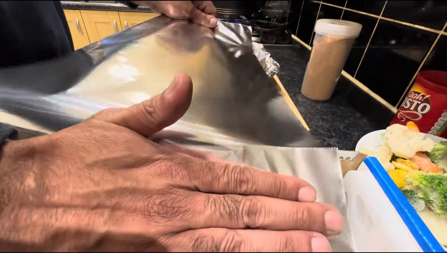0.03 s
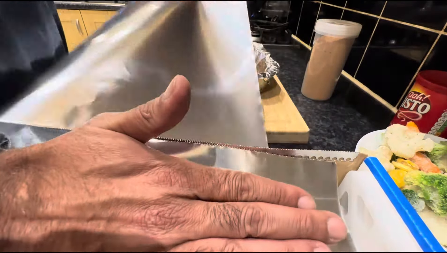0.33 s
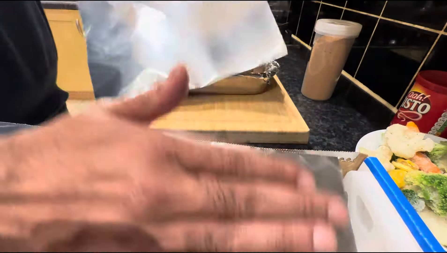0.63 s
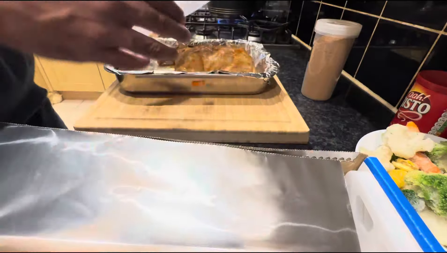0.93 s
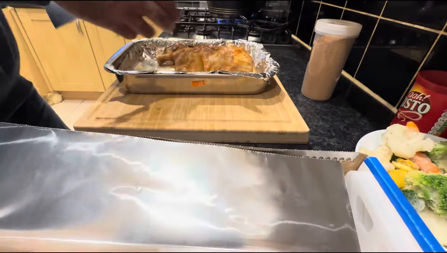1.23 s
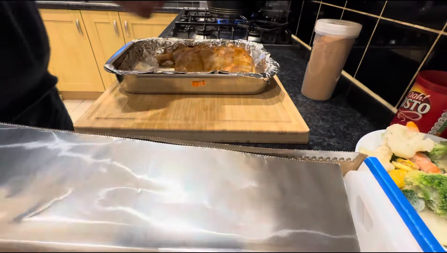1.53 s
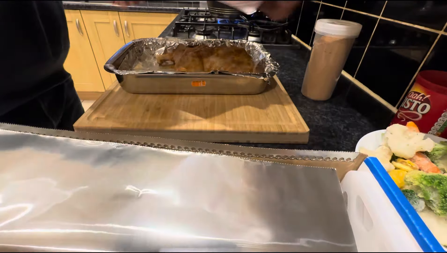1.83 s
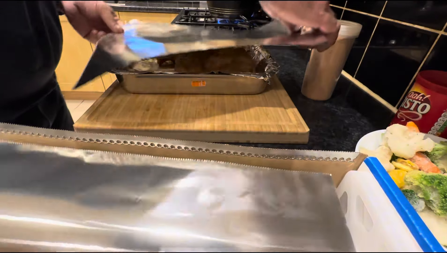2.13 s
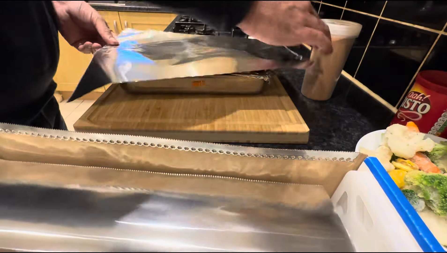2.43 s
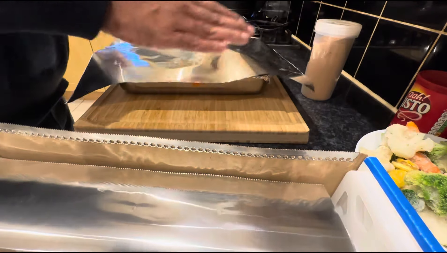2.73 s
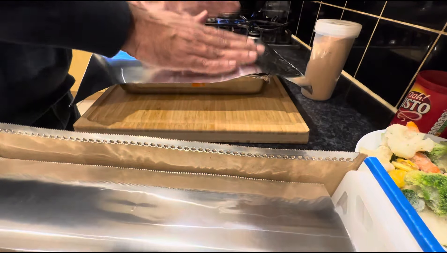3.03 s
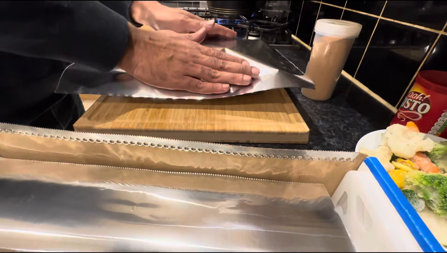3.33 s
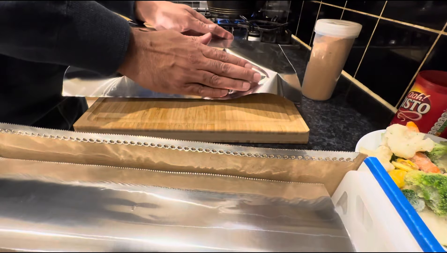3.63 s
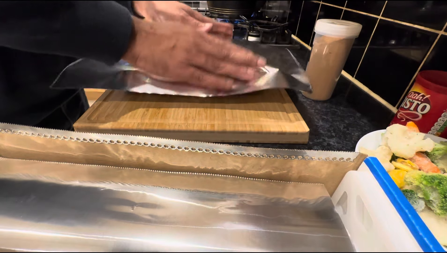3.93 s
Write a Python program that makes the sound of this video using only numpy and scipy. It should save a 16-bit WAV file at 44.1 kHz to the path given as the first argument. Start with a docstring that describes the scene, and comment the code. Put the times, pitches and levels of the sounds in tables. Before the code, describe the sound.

Aluminium foil ripped from its box, then crinkling as it is pressed over a tray.

```python
"""Tearing foil and covering a tray

Aluminium foil is ripped along the toothed edge of its box, lifted, spread and pressed over a roasting
tray. Every tooth plucks the sheet; afterwards tiny creases buckle in swarms as the hands move it,
with a few sharper snaps. A tiled kitchen answers, and appliances hum behind it all."""
import sys
import numpy as np
from scipy import signal
from scipy.fft import rfft, irfft, next_fast_len
from scipy.io import wavfile
from scipy.ndimage import uniform_filter1d

SR = 44100
rng = np.random.default_rng(int(sys.argv[2]) if len(sys.argv) > 2 else 0)


def log_audio(samples):
    """Write samples as a 16-bit WAV file to the path given in sys.argv[1]."""
    # one column per channel
    frames = np.atleast_2d(samples).T
    # limit to full scale, then quantise
    limited = np.clip(frames, -1, 1)
    pcm = np.round(limited * 32767).astype(np.int16)
    wavfile.write(sys.argv[1], SR, pcm)


N = 176400


def amp(db):
    """Decibels to gain."""
    return 10 ** (np.asarray(db) / 20)


def unit(x):
    """Scale to rms 1."""
    return x / np.sqrt(np.mean(x ** 2) + 1e-20)


def along(points, hz):
    """Interpolate (freq_hz, value) points on a log axis."""
    freqs, values = np.transpose(points)
    return np.interp(np.log(hz + 1), np.log(freqs + 1), values)


def curves(rows):
    """One value per sample for each column after time_s."""
    time_s, *columns = np.transpose(rows)
    return [np.interp(np.arange(N) / SR, time_s, column) for column in columns]


def during(rows, fade_s=0.011):
    """Gate: 1 from the first row's time to the last, fading outside."""
    t = np.arange(N) / SR
    return np.clip(np.minimum(t - rows[0][0], rows[-1][0] - t) / fade_s + 1, 0, 1)


def filtered(x, response):
    """Apply a frequency response, given as a function of Hz."""
    n = x.shape[-1]
    padded = next_fast_len(n + 8192)
    return irfft(rfft(x, padded) * response(np.fft.rfftfreq(padded, 1 / SR)), padded)[..., :n]


def coloured(x, spectrum, size=4096):
    """Minimum-phase filter from (freq_hz, gain_db) points; output rms 1."""
    cepstrum = irfft(np.log(amp(along(spectrum, np.fft.rfftfreq(size, 1 / SR)))))
    cepstrum[1:size // 2] *= 2
    cepstrum[size // 2 + 1:] = 0
    impulse = irfft(np.exp(rfft(cepstrum)))
    return unit(signal.fftconvolve(x, impulse[None], axes=1)[:, :x.shape[1]])


def evened(x, size=2600):
    """Level out slow swells, keep the grain."""
    power = uniform_filter1d(np.mean(x ** 2, axis=0), size)
    return x / np.sqrt(np.abs(power) + 1e-9)


def noise_band(hz, width_hz):
    """Narrow-band stereo noise, rms 1."""
    return unit(filtered(rng.standard_normal((2, N)), lambda f: np.exp(-((f - hz) / width_hz) ** 2)))


def creases(per_s, spread_db, life_s, top_hz, size=128):
    """A stereo swarm of buckling creases: short damped rings, each from its own place on the sheet."""
    when, pitch, strength, life, place, phase = rng.random((int(per_s * N / SR), 6)).T[:, :, None]
    k = np.arange(size)
    decay_samples = life_s * SR * 4 ** (life - .5)
    gain = amp(-spread_db * np.log(1 - .99 * strength)) / np.sqrt(decay_samples)
    rings = gain * np.exp(-k / decay_samples) * np.cos(2 * np.pi * (pitch * top_hz * k / SR + phase))
    at = (when * N).astype(int) + k
    lags = (40 * place).astype(int), 16  # left, right, in samples
    return np.array([np.bincount((at + lag).ravel(), rings.ravel(), N)[:N] for lag in lags])


# motor hum: time_s, pitch_hz, level_db
MOTOR_HUM = [(0.0, 53.6, -37.5), (0.73, 55.1, -32), (0.96, 53.85, -37.5), (1.28, 55.15, -35),
             (1.59, 54.6, -39), (2.61, 56.96, -42), (3.24, 57.7, -43), (3.49, 59.9, -42), (3.65, 57, -47.5),
             (3.78, 60, -70)]
# noise spectra: freq_hz, gain_db
RUMBLE_SPECTRUM = [(20, -28), (45, -24), (70, -10), (100, -11), (122, 0), (150, -12), (190, -26),
                   (400, -32), (2000, -78)]
AIR_SPECTRUM = [(60, -20.5), (230, 1.5), (400, -6.5), (750, -0.5), (1060, 2), (1400, -5.5), (3000, -19.5),
                (8000, -15.5), (16000, -30)]
# appliance whines: pitch_hz, level_db
WHINE_BANDS = [(1080, -60.5), (2970, -69), (5630, -69), (7660, -69)]


def appliances(mains_hz=101, mains_db=-52, rumble_db=-49, air_db=-51):
    """A motor that gathers speed and fades, mains hum, rumble, a faint rush of air and thin whines."""
    motor_hz, motor_db = curves(MOTOR_HUM)
    motor = amp(motor_db) * np.sin(2 * np.pi * np.cumsum(motor_hz) / SR)
    mains = amp(mains_db) * np.sin(2 * np.pi * mains_hz * np.arange(N) / SR)
    rumble = unit(filtered(rng.standard_normal(N), lambda f: amp(along(RUMBLE_SPECTRUM, f))))
    air = unit(filtered(rng.standard_normal((2, N)), lambda f: amp(along(AIR_SPECTRUM, f))))
    whines = sum(amp(db) * noise_band(hz, width_hz=83) for hz, db in WHINE_BANDS)
    return np.sqrt(2) * (motor + mains) + amp(rumble_db) * rumble + amp(air_db) * air + whines


# room decay: freq_hz, t60_s
KITCHEN_DECAY = [(150, 0.42), (600, 0.61), (2000, 0.67), (4000, 0.66), (8000, 0.47), (12000, 0.26)]


def kitchen(x, early_db=-1.5, early_s=0.011, tail_db=-5.5, rise_s=0.0048, block=8820):
    """Reflections off worktop and tiles, then the tail; drawn anew each block, as the sheet moves."""
    noise = rng.standard_normal((N // block + 1, 2, SR // 2))
    hz, t, bands = signal.stft(noise, SR, nperseg=256)
    decay = amp(-60 * t / along(KITCHEN_DECAY, hz)[:, None])
    tails = signal.istft(bands * decay, SR, nperseg=256)[1]
    t = np.arange(tails.shape[-1]) / SR
    tails = unit(tails * np.clip(t / rise_s, 0, 1))
    early = unit(rng.standard_normal(tails.shape) * np.exp(-t / early_s))
    responses = (amp(tail_db) * tails + amp(early_db) * early) / np.sqrt(len(t))
    out = np.zeros((2, N + SR))
    for i, response in zip(range(0, N, block), responses):
        part = signal.fftconvolve(x[:, i:i + block], response, axes=1)
        out[:, i:i + part.shape[1]] += part
    return out[:, :N]


# hand moves: time_s, crackle_db, rustle_db
LIFTING = [(.4, -37, -37), (.454, -29.5, -38.5), (.54, -31.5, -36.5), (.63, -25.5, -34), (.68, -35.5, -40),
           (.806, -33.5, -38), (.96, -59, -50), (1.07, -53, -46.5), (1.14, -56, -51.5)]
CARRYING = [(1.149, -45, -41), (1.165, -40.5, -43), (1.244, -32.5, -38.5), (1.325, -37, -44),
            (1.355, -26.5, -39), (1.52, -31, -40), (1.565, -29, -41), (1.621, -36.5, -45.5),
            (1.72, -35, -42), (1.81, -33.5, -44), (1.91, -39.5, -43.5), (2.0, -34.5, -43)]
SPREADING = [(2.012, -32.5, -43), (2.045, -27, -44), (2.138, -36.5, -42), (2.184, -22, -31.5),
             (2.217, -29.5, -41.5), (2.384, -32.5, -39.5), (2.518, -30.5, -39.5), (2.562, -43, -49),
             (2.62, -63, -45)]
PRESSING = [(3.005, -47, -52), (3.03, -32.5, -38.5), (3.07, -28, -42.5), (3.092, -22.5, -33),
            (3.172, -30, -39.5), (3.45, -33, -41), (3.5, -45.5, -42.5), (3.535, -32.5, -45),
            (3.6, -73, -53), (3.67, -68, -60)]
TUCKING = [(3.735, -61, -41.5), (3.75, -41.5, -48), (3.797, -44, -45), (3.825, -23.5, -31.5),
           (3.866, -37, -49.5), (3.94, -32, -42), (4.0, -39.5, -44.5)]
# crease spectra: freq_hz, gain_db
CRACKLE_SPECTRUM = [(300, -54), (1500, -17.5), (3000, -4), (4500, -1), (6000, 1.5), (8000, -0.5),
                    (11000, -4), (16000, -9.5)]
RUSTLE_SPECTRUM = [(80, -42.5), (250, -7.5), (450, -9.5), (700, -10), (1050, -1), (2000, 0.5), (2800, 1),
                   (4500, -6.5), (16000, -40)]
TRAY_SPECTRUM = [(100, -16), (300, -19), (550, -3), (800, -7.5), (1300, -5), (3000, -31), (16000, -76)]


def handling(hollow_db=-4.5):
    """Small creases crackle and wide ones rustle as the sheet moves; on the tray it also sounds hollow."""
    small = creases(per_s=3000, spread_db=3.5, life_s=0.0002, top_hz=17000, size=40)
    wide = creases(per_s=900, spread_db=1, life_s=0.00059, top_hz=4960)
    over_tray = creases(per_s=250, spread_db=3, life_s=0.00072, top_hz=2087)
    crackle = evened(coloured(small, CRACKLE_SPECTRUM))
    rustle = evened(coloured(wide, RUSTLE_SPECTRUM))
    hollow = evened(coloured(over_tray, TRAY_SPECTRUM)) * amp(hollow_db)
    in_air = np.vstack([LIFTING, CARRYING, SPREADING])
    on_tray = np.vstack([PRESSING, TUCKING])
    out = np.zeros((2, N))
    for moves, body in ((in_air, rustle), (on_tray, rustle + hollow)):
        crackle_db, rustle_db = curves(moves)
        out += during(moves) * (amp(crackle_db + 1) * crackle + amp(rustle_db + 2) * body)
    return out


# creases snapping through: start_s, level_db, pitch_hz, decay_s
CREASE_SNAPS = [(0.558, -15, 5140, 0.025), (0.79, -27, 8200, 0.011), (.991, -35.5, 6750, 0.0037),
                (1.224, -25.5, 7100, .014), (1.341, -26, 7000, 0.053), (1.556, -26.5, 5520, 0.015),
                (2.197, -23, 6540, 0.038), (3.08, -16.5, 5000, 0.02), (3.191, -25, 12100, .0074),
                (3.352, -23.5, 12500, .012), (3.415, -18.5, 14200, .004), (3.441, -27, 7020, .012),
                (3.481, -30, 11500, 0.0049), (3.588, -34, 8500, .005), (3.63, -21.5, 5600, 0.0069),
                (3.729, -28.5, 6200, .0076), (3.807, -22, 5270, 0.026)]
# snap spectrum: freq_hz, gain_db
SNAP_SPECTRUM = [(100, -26), (500, -8.5), (1500, -5), (6000, -10.5), (10000, -6), (16000, -4.5)]


def snaps(ring_q=2.8, ring_gain=4.3):
    """A crease gives way with a crack and sets off a quickly dying run of smaller ones."""
    out = np.zeros((2, N + SR))
    swarm = evened(creases(per_s=2800, spread_db=2, life_s=0.0001, top_hz=18000, size=32), size=400)
    t = np.arange(SR // 8) / SR
    for start_s, db, hz, decay_s in CREASE_SNAPS:
        i = round(start_s * SR)
        run = swarm[:, i:i + len(t)] * np.exp(-t / decay_s)
        run[:, 0] += 7  # opening crack
        rung = filtered(run, lambda f: 1 + ring_gain / (1 + 1j * ring_q * (f / hz - hz / (f + 1))))
        gain = amp(db) * np.sqrt(decay_s / t[-1] / 2)
        out[:, i:i + len(t)] += gain * coloured(rung, SNAP_SPECTRUM)
    return out[:, :N]


# flexing panels: start_s, level_db, pitch_hz, swell_s, glide_hz_per_s
PANEL_RINGS = [(.012, -23, 1402, .018, 1500), (.035, -27, 2035, 0.032, -600),
               (.105, -25, 1920, 0.021, -2800), (.118, -26, 1950, .02, 4500),
               (.138, -27, 2860, 0.0083, 4000), (1.905, -49, 301, 0.018, 0),
               (1.934, -36, 2100, 0.0067, -3000), (2.045, -40, 700, 0.0055, 0),
               (3.35, -34, 805, 0.0075, -7), (3.468, -46, 543, 0.015, 2)]


def panels(waver_rad=1.2):
    """A flexing panel of the sheet swells into a short, rough tone that glides as its tension changes."""
    out = np.zeros((2, N))
    for start_s, db, hz, swell_s, glide in PANEL_RINGS:
        t = np.maximum(np.arange(N) / SR - start_s, 0)
        phase = 2 * np.pi * (hz + glide * t / 2) * t + waver_rad * noise_band(0, width_hz=185)
        envelope = (t / swell_s * np.exp(1 - t / swell_s)) ** 2
        out += amp(db) * envelope * np.sin(phase)
    return np.sqrt(2) * out


# tear envelope: time_s, split_db, flutter_db
TEAR_LEVELS = [(0.0, -14.5, -16), (0.028, -18.5, -25.5), (0.108, -18, -29), (0.12, -18.5, -25),
               (0.224, -21, -26), (0.26, -23, -27), (0.4, -39.5, -44)]
# tear spectra: freq_hz, gain_db
SPLIT_SPECTRUM = [(300, -46), (1500, -40), (3000, -3.5), (4500, -3.5), (6500, -1), (8000, -1.5),
                  (11000, -3.5), (16000, -3.5)]
FLUTTER_SPECTRUM = [(100, -43), (300, -19), (600, -11), (1000, 0.5), (2000, -0.5), (2800, -3),
                    (4500, -11.5), (16000, -37)]


def tear():
    """The metal splits in a dense crackle while the sheet flutters."""
    split_db, flutter_db = curves(TEAR_LEVELS)
    small = creases(per_s=4500, spread_db=2.5, life_s=0.00008, top_hz=16600, size=32)
    wide = creases(per_s=1700, spread_db=4, life_s=0.00055, top_hz=5040)
    split = evened(coloured(small, SPLIT_SPECTRUM)) * amp(split_db + 3)
    flutter = evened(coloured(wide, FLUTTER_SPECTRUM)) * amp(flutter_db + 0.5)
    return (split + flutter) * during(TEAR_LEVELS)


# cutting speed: time_s, teeth_per_s
TOOTH_RATE = [(0, 800), (.01, 690), (.024, 670), (.033, 720), (.041, 610), (.052, 550), (.066, 520),
              (.071, 315), (.098, 325), (.11, 400), (.17, 380), (.18, 200), (.23, 215), (.32, 230)]
# drone of the taut sheet: time_s, tone_db, rasp_db
DRONE_LEVELS = [(0, -29, -22.5), (.018, -15.5, -24), (.032, -33, -27), (.05, -18.5, -22.5),
                (.066, -34, -22), (.088, -32, -23.5), (.105, -48, -24), (.132, -26, -27), (.15, -36, -37),
                (.175, -34, -33), (.195, -36, -29.5), (.225, -30.5, -26.5), (.265, -38, -30.5),
                (.32, -52, -43)]
# rasp spectrum: freq_hz, gain_db
RASP_SPECTRUM = [(60, -57.5), (190, -2), (280, -1.5), (420, 0), (700, -3.5), (1000, -5.5), (1400, -14.5),
                 (2000, -10), (4000, -31), (16000, -40)]


def teeth(scatter_periods=0.047, scatter_growth_per_s=0.3, spread_db=2, waver_rad=0.63, lead_s=0.00049):
    """The teeth pluck the taut sheet ever more slowly and unevenly: a falling tone and its rasp."""
    rate_hz, = curves(TOOTH_RATE)
    tone_db, rasp_db = curves(DRONE_LEVELS)
    teeth_cut = np.cumsum(rate_hz) / SR
    at = np.flatnonzero(np.diff(np.floor(teeth_cut)))
    late, strength = rng.standard_normal((len(at), 2)).T
    scatter = scatter_periods + scatter_growth_per_s * at / SR
    at = np.clip(at + scatter * late * SR / rate_hz[at], 0, N - 1).astype(int)
    plucks = np.bincount(at, amp(spread_db * strength), N)[None]
    rasp = evened(coloured(plucks, RASP_SPECTRUM), size=900)[0] * amp(rasp_db)
    lead = np.array([[.5], [-.5]]) * lead_s * rate_hz  # left hears the tone first
    phase = 2 * np.pi * (teeth_cut + lead) + waver_rad * noise_band(0, width_hz=185)
    tone = np.sqrt(2) * np.cos(phase) * amp(tone_db)
    gate = during(TOOTH_RATE)
    return tone * gate, rasp * gate


def scene():
    """The foil in the kitchen, over the appliances; the taut sheet is close and so drier."""
    crinkle = tear() + handling() + snaps()
    tone, rasp = teeth()
    rings = panels()
    pan_left = amp([[1.5], [-1.5]])
    room = kitchen(crinkle + amp(-4.5) * (rasp + rings) + amp(-8) * tone)
    return amp(-7) * crinkle + pan_left * (tone + rasp) + rings + room + appliances()


# stereo width: freq_hz, side_gain
STEREO_WIDTH = [(100, 0.88), (400, 0.83), (1000, 1.12), (6000, 0.86), (8000, 0.91), (9300, 0.3),
                (16000, 0.1)]
# balance: freq_hz, left_minus_right_db
STEREO_BALANCE = [(60, 2), (150, -2.5), (400, 2.5), (950, -2), (2000, -2.5), (4000, -3), (6000, -9),
                  (8000, -3), (10000, 0)]
# phase between channels: freq_hz, left_lead_rad
TREBLE_PHASE = [(7500, 0), (8600, 2), (9200, 3.14), (9550, 3.14), (10200, 0), (12200, 0), (12700, -3.14),
                (13900, -3.14), (14700, -6.28)]


def record(dry, top_hz=15900):
    """The sound leans right in the treble; the top octave is nearly mono,
    with left and right in opposite phase around 9.4 and 13.3 kHz."""
    mid = (dry[0] + dry[1]) / 2
    side = filtered((dry[0] - dry[1]) / 2, lambda f: along(STEREO_WIDTH, f))
    halves = np.array([[.5], [-.5]])

    def response(f):
        balance = amp(halves * along(STEREO_BALANCE, f))
        return balance * np.exp(1j * halves * along(TREBLE_PHASE, f)) * (f < top_hz)

    return filtered(np.array([mid + side, mid - side]), response)


dry = scene()
out = record(dry)
log_audio(out)
```